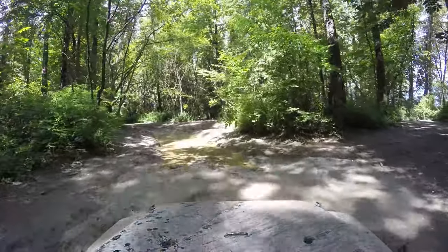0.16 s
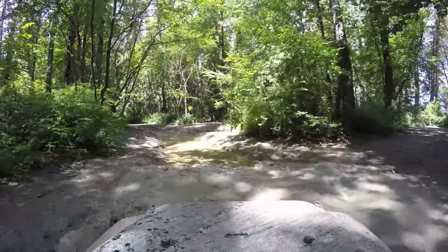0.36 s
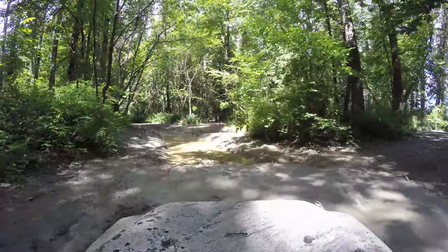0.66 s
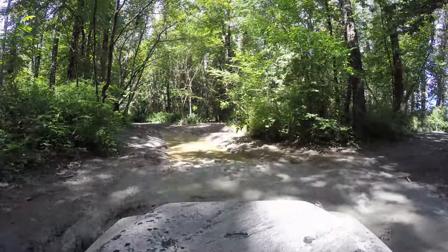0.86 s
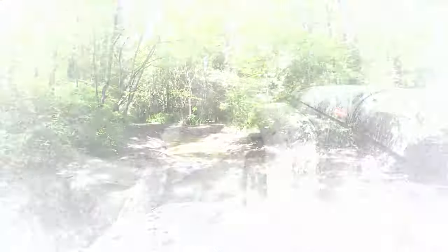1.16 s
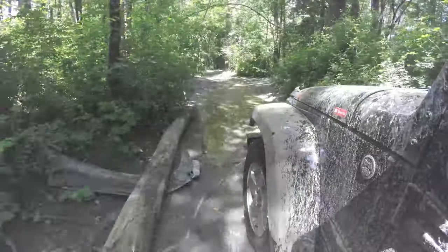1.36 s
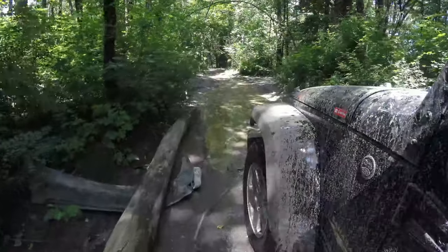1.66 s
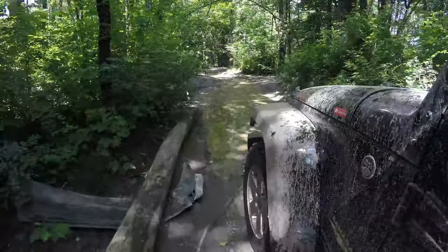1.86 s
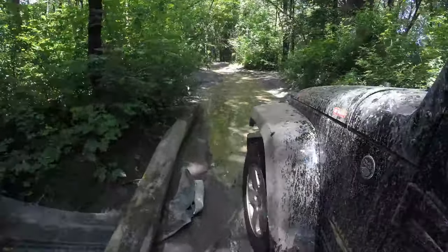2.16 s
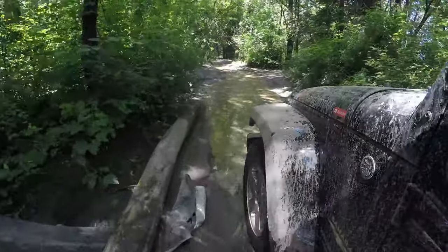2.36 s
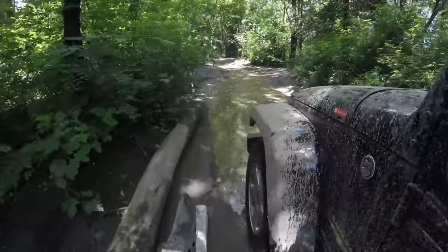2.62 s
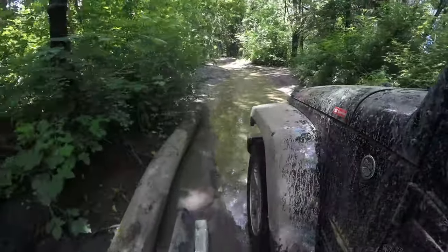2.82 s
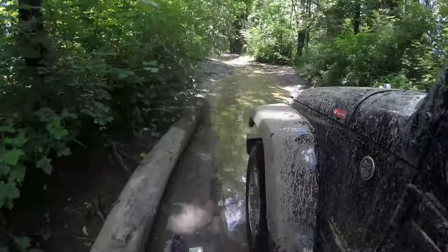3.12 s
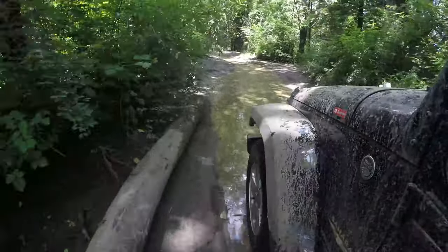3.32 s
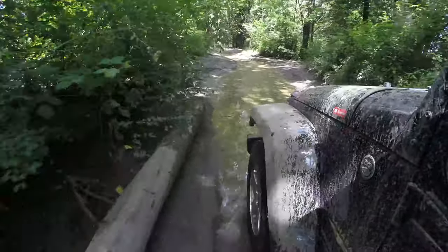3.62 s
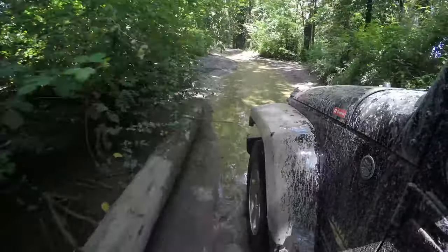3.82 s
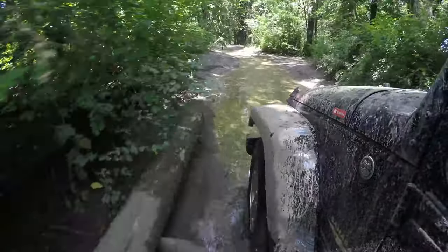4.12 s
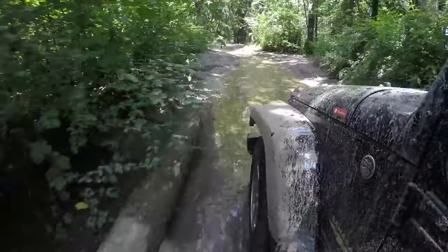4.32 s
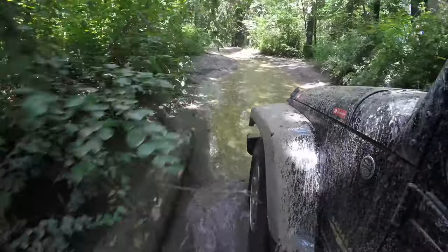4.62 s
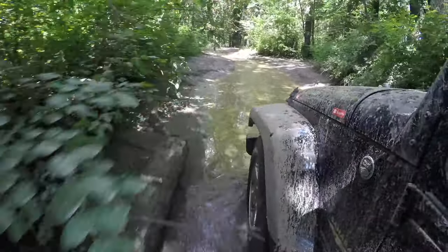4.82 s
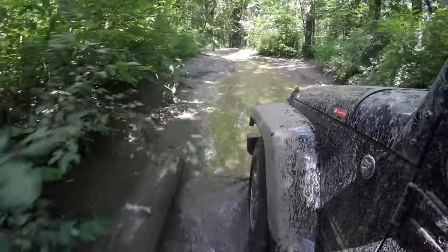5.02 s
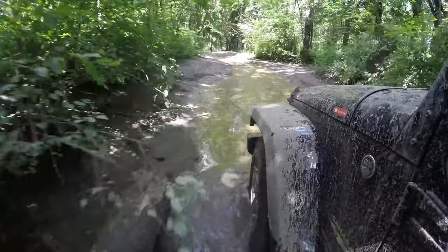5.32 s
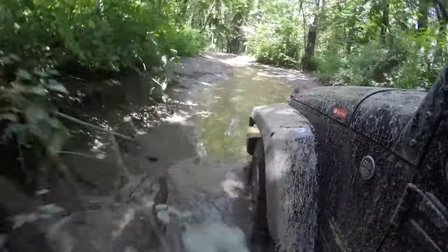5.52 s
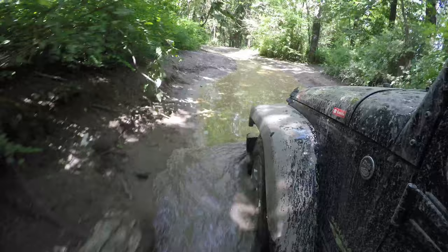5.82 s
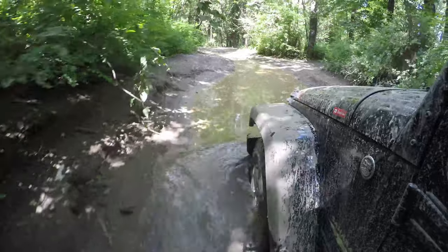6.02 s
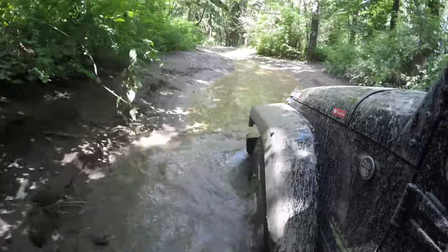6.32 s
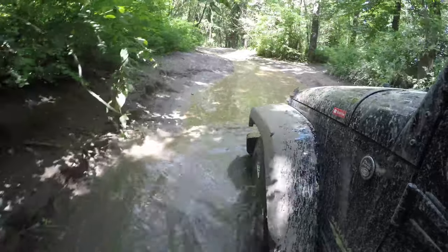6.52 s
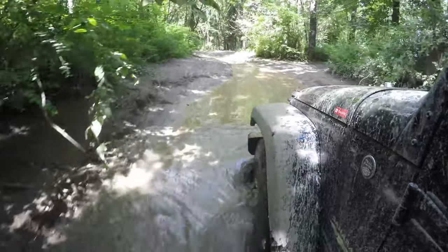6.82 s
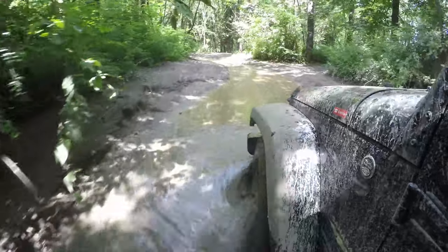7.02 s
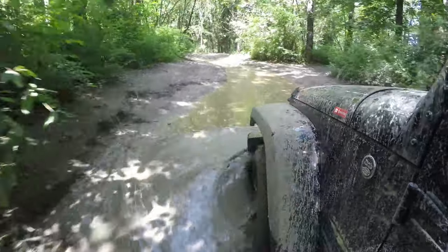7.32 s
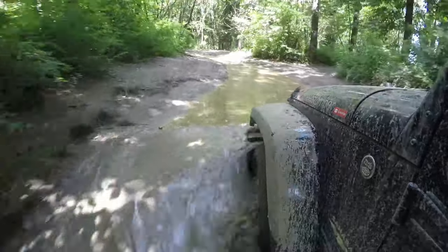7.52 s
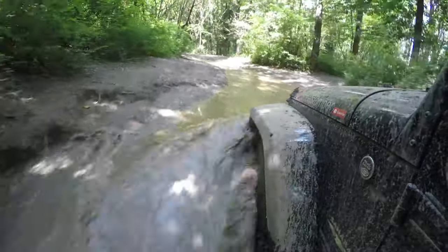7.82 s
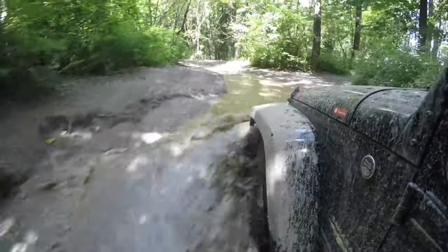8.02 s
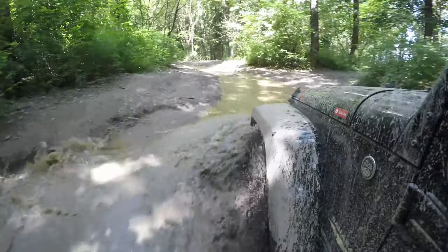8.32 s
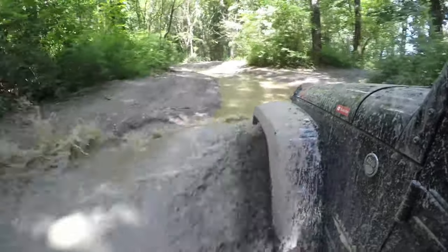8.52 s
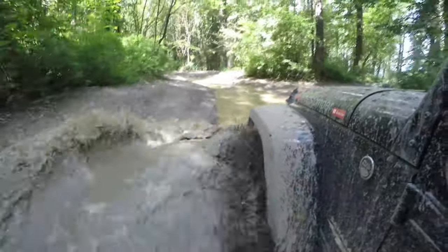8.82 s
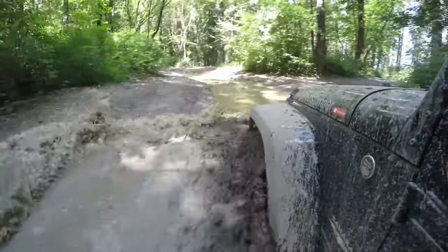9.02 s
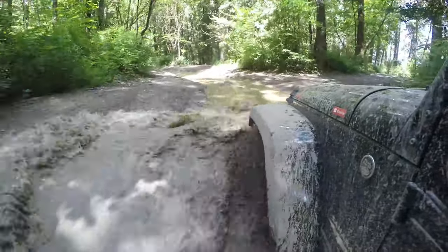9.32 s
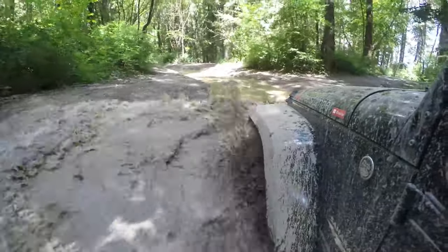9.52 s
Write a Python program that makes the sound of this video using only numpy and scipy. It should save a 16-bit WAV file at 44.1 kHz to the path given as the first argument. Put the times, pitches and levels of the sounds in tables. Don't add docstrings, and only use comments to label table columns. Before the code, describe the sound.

Mounted on an off-road vehicle's hood, the microphone catches a booming six-cylinder engine, valve clatter and a loose metallic rattle. Within about a second and a half it crossfades to the door side, much quieter: low hum, thin water spray, tiny drops and twigs ticking on the case. The water deepens, the engine revs and labours, and muddy splashes and knocks close it. A very low throbbing wobble runs throughout.

```python
import sys
import numpy as np
from scipy import signal
from scipy.fft import rfft, irfft, next_fast_len
from scipy.io import wavfile
from scipy.ndimage import uniform_filter1d

SR = 44100
rng = np.random.default_rng(int(sys.argv[2]) if len(sys.argv) > 2 else 0)


def bounce(signal):
    frames = np.transpose(np.atleast_2d(signal))
    limited = np.clip(frames, -1, 1)
    pcm = np.round(limited * 32767).astype(np.int16)
    wavfile.write(sys.argv[1], SR, pcm)


def attenuation_scalar(level_db):
    decades = np.asarray(level_db, float) / 20
    return 10 ** decades


N = 426006


def seconds():
    return np.arange(N) / SR


def evened(x):
    return x / np.sqrt(np.mean(x ** 2) + 1e-20)


def track(rows):
    s, *columns = np.transpose(rows)
    t = seconds()
    lead_s = 0.03 * (s[0] <= 0)
    on = np.clip(np.minimum(t - s[0] + lead_s, s[-1] + 0.01 - t) / 0.03, 0, 1)
    return [np.interp(t, s, c) for c in columns] + [on]


def body(slope, modes=(), notch=(1, 1, 0)):
    hz = np.fft.rfftfreq(32768, 1 / SR)
    f, db = np.transpose(slope)
    power = attenuation_scalar(np.interp(np.log(hz + 1), np.log(f), db)) ** 2
    for centre_hz, width, peak_db in modes:
        power = power + attenuation_scalar(peak_db) ** 2 / (1 + (2 * (hz - centre_hz) / width) ** 2) ** 2
    power = power / (1 + (hz / f[-1]) ** 6)
    notch_hz, notch_width, depth = notch
    power = power * (1 - min(depth, 1) / (1 + (2 * (hz - notch_hz) / notch_width) ** 2))
    log_gain = 0.5 * np.log(np.concatenate([power, power[-2:0:-1]]) + 1e-14)
    taps = np.fft.ifft(np.exp(np.conj(signal.hilbert(log_gain)))).real[:len(hz)]
    taps = taps * np.cos(np.linspace(0, np.pi / 2, len(hz))) ** 2
    return taps / np.linalg.norm(taps)


def ring(drive, taps):
    return signal.oaconvolve(drive, taps)[:N]


def drift(span_s):
    size = max(round(span_s * SR), 2)
    return evened(uniform_filter1d(uniform_filter1d(rng.standard_normal(N), size), size))


def patchy(patchy_db, flicker_db, size, count=N):
    frames = count // (size // 4) + 5
    a, b, patches = rng.standard_normal((frames, size // 2 + 1, 3)).T
    patches = uniform_filter1d(patches, max(round(700 * size / SR), 1), 0)
    patches = evened(uniform_filter1d(patches, max(round(0.03 * 4 * SR / size), 2), 1))
    flicker = evened(uniform_filter1d(rng.standard_normal(frames), 6))
    z = (a + 1j * b) * attenuation_scalar(patchy_db * patches + flicker_db * flicker)
    noise = signal.istft(z, nperseg=size, noverlap=size - size // 4)[1][:count]
    return np.pad(evened(noise), (0, N - count))


def tone(hz, size, waver):
    turns = np.cumsum(hz * (1 + waver * drift(0.04))) / SR
    return np.sqrt(2) * size * np.cos(2 * np.pi * turns)


def bursts(times, peaks_db, length_s):
    out, t = np.zeros(N + 2048), np.arange(2048) / SR
    shape = (1 - np.exp(-t / 0.001)) * np.exp(-t / length_s)
    for s, db, noise in zip(times, peaks_db, rng.standard_normal((len(times), 2048))):
        out[round(s * SR):][:2048] += attenuation_scalar(db) * noise * shape
    return out[:N]


def blows(rows):
    s, db = np.transpose(rows)
    out = np.zeros(N)
    out[np.round(s * SR).astype(int)] = attenuation_scalar(db)
    return out


def thirds(x):
    size = next_fast_len(len(x))
    z, hz = rfft(x, size), np.fft.rfftfreq(size, 1 / SR)
    low = 1 / (1 + (hz / 3150) ** 8)
    top = 1 - 1 / (1 + (hz / 5400) ** 8)
    return [irfft(z * share, size)[:len(x)] for share in (low, 1 - low - top, top)]


def arch(start, length, crest, flat=1.):
    u = np.clip((seconds() - start) / length, 0, 1)
    bend = np.log(0.5) / np.log(np.clip(crest, 0.1, 0.9))
    return abs(np.sin(np.pi * u ** bend)) ** flat * (u < 1)


def peak(hz, centre_hz, width):
    return 1 / np.sqrt(1 + (2 * (hz - centre_hz) / width) ** 2)


# start in seconds, rms level in dB,
# crest as share of length, swing left over at the start in dB.
HOOD_SWELLS = [
    (0.0, -19.5, 0.089, -35),
    (0.13, -23, 0.68, -36),
    (0.26, -28, 0.36, -35),
    (0.34, -17.5, 0.55, -27),
    (0.52, -17.5, 0.34, -15.5),
    (0.9, -22.5, 0.8, -34.5),
    (1.08, -28, 0.35, -27),
]
DOOR_SWELLS = [(1.159, -18.5, 0.45, -30), (1.971, -29.5, 0.31, -25), (2.171, -31.5, 0.53, -46),
               (2.439, -24.5, 0.48, -26.5), (2.6, -19, 0.5, -48), (3.162, -19.5, 0.46, -24.5),
               (3.4, -23.5, 0.28, -37), (3.88, -26, 0.67, -50), (4.169, -22, 0.43, -34),
               (4.5, -23, 0.58, -28), (4.738, -30, 0.38, -45), (4.852, -28.5, 0.32, -33),
               (5.25, -27, .5, -23.5), (5.4, -21.5, 0.34, -60), (5.719, -24.5, 0.51, -36),
               (5.95, -23.5, 0.51, -25), (6.1, -21, 0.55, -31), (6.349, -20.5, 0.53, -23),
               (6.555, -19, 0.45, -19.5), (6.801, -23, 0.44, -37), (7.232, -18.5, 0.5, -36),
               (7.449, -19.5, 0.71, -21.5), (7.85, -17.5, 0.6, -39), (8.121, -19, 0.47, -16),
               (8.35, -16, 0.67, -15.5), (8.802, -15.5, 0.38, -19), (9.1, -18.5, 0.51, -24),
               (9.29, -20.5, 0.69, -42), (9.422, -17, 0.31, -36)]
# time in seconds, pitch in Hz.
ARM_NOTE = [(0.0, 35.6), (0.21, 37.3), (1.91, 39.16), (3.12, 39.9), (3.28, 37), (3.79, 37.16), (3.9, 33.2),
            (4.14, 39.7), (4.71, 38.85), (4.87, 36.32), (6.19, 35.16), (6.38, 38.98), (8.47, 37.64),
            (8.98, 35.03), (9.66, 39.05)]
# centre in Hz, width in Hz, level in dB.
ARM_SHAKE = [(38., 8., -50.), (25., 10., -44.)]


def camera_arm():
    s, db, crest, left_db = np.transpose([*HOOD_SWELLS, *DOOR_SWELLS])
    t = seconds()
    k = np.maximum(np.searchsorted(s, t, "right") - 1, 0)
    length = np.diff(np.r_[s, 9.72])
    kick = (-1.) ** k * attenuation_scalar(db[k] + 5) * arch(s[k], length[k], crest[k], flat=0.7)
    kick = uniform_filter1d(uniform_filter1d(kick, 120), 120) * attenuation_scalar(0.6 * drift(0.036))
    left_over = 1j * attenuation_scalar(np.interp(t, s, left_db))
    turns = np.cumsum(track(ARM_NOTE)[0]) / SR
    swing = np.sqrt(2) * ((kick + left_over) * np.exp(2j * np.pi * turns)).real
    shake = sum(attenuation_scalar(db) * body([(10, -63), (80, -82.5)], [(hz, width, 0)]) for hz, width, db in ARM_SHAKE)
    return swing + ring(rng.standard_normal(N), shake)


def valve_train(turns):
    count = 2 * SR
    waver = drift(0.094)[(np.arange(40)[:, None] * 9000 + np.arange(count)) % N]
    comb = 0
    for k in range(11, 21):
        phase = k * turns[:count] + 0.07 * waver[k + 12] + rng.random()
        comb = comb + attenuation_scalar(4.6 * waver[k]) / k * np.cos(2 * np.pi * phase)
    return np.pad(evened(comb), (0, N - count))


# time in seconds, crank turns a second.
HOOD_REV = [
    (0.0, 39.4),
    (0.346, 38.8),
    (0.546, 37.8),
    (0.698, 39.5),
    (0.82, 41.7),
    (1.04, 45.0),
    (1.226, 47.0),
    (1.32, 47.0),
    (1.55, 43.8),
]
# time in seconds, level in dB.
HOOD_LOAD = [
    (0.0, 2),
    (0.04, -14.5),
    (0.14, -2.5),
    (0.36, 2.5),
    (0.44, -6),
    (0.53, 0.5),
    (0.7, -6.5),
    (1.0, -2),
    (1.08, 2.5),
]
# multiple of crank speed, level in dB.
FIRING_OVERTONES = [(6, 1), (12, -17.5)]
# multiple of crank speed, level in dB.
CRANK_ORDERS = [(2, -42), (3.5, -33), (4.5, -40), (5, -40), (7, -45), (8, -48)]
# frequency in Hz, level in dB.
HOOD_RUMBLE = [(40, -2.5), (60, 8.5), (100, 1), (145, 16.5), (200, -7), (400, -10), (550, -18),
               (800, -51.5)]
# frequency in Hz, level in dB.
HOOD_CLATTER = [(300, -16.5), (600, -11.5), (1300, 0.5), (1650, -14), (2600, -18), (6000, -27), (9000, -38),
                (16000, -47)]
# centre in Hz, width in Hz, level in dB.
HOOD_CASE = [(955, 69, 3.5), (1196, 55, 7), (2045, 640, -5), (3400, 550, -31.5), (5000, 600, -25)]


def hood_engine():
    rev, load_db = track(HOOD_REV)[0], track(HOOD_LOAD)[0]
    on = np.interp(seconds(), (1.023, 1.493), (1, 0)) ** 1.32
    turns = np.cumsum(rev) / SR
    roar_db = 0.14 * load_db
    rumble_db, clatter_db = -33 + roar_db, -38 + roar_db

    boom_hz, boom_width = 143.2, 14
    fire = attenuation_scalar(load_db - 13) * peak(rev * 3, boom_hz, boom_width)
    fourth = attenuation_scalar(load_db - 13) * peak(rev * 4, boom_hz, boom_width)
    lines = fire * attenuation_scalar(1.5 * drift(0.05)) * np.cos(6 * np.pi * turns)
    lines = lines + fourth * attenuation_scalar(2.5 * drift(0.05)) * np.cos(8 * np.pi * turns)
    overtones = sum(attenuation_scalar(db - 18.5) * np.cos(2 * np.pi * np.round(k) * turns) for k, db in FIRING_OVERTONES)
    lines = lines + fire * on * attenuation_scalar(4.3 * drift(0.053)) * overtones
    lines = lines + fire * attenuation_scalar(-30.5 + 5 * drift(0.06)) * np.cos(18 * np.pi * turns)
    lines = lines * attenuation_scalar(0.57 * drift(0.0039))
    for k, db in CRANK_ORDERS:
        size = attenuation_scalar(db + clatter_db + 37.5 + 4 * drift(0.15))
        lines = lines + size * np.cos(2 * np.pi * (k * turns + rng.random()))

    roar = patchy(1.4, 0.4, size=1024, count=2 * SR)
    rumble = attenuation_scalar(rumble_db + 11) * ring(roar, body(HOOD_RUMBLE))
    ticking = patchy(1.4, 0.56, size=256, count=2 * SR) + 0.32 * valve_train(turns)
    clatter = attenuation_scalar(clatter_db + 2.5) * ring(ticking, body(HOOD_CLATTER, HOOD_CASE))
    return np.sqrt(2) * on * lines + on ** 1.05 * (rumble + clatter)


# time in seconds, peak level in dB.
RATTLES = [(0.249, -38), (0.265, -11), (0.3581, -32), (0.382, -9), (0.395, -11), (0.4379, -7.5),
           (0.4444, -10), (0.523, -9.5), (0.5529, -8.5), (0.5774, -10.5), (0.975, -13)]
CLIP_MODES = [(2046, 7.5, 0.019), (2214, 6.5, 0.016), (2940, -17.5, 0.025), (3420, -7.5, 0.0091),
              (4900, -24, 0.017), (6700, -33, 0.019), (7400, -46, 0.015), (8000, -35, .02),
              (10600, -39.5, 0.016)]


def rattling_clip():
    s, db = np.transpose(RATTLES)
    t = np.arange(2048) / SR
    modes = 0
    for hz, mode_db, t60 in CLIP_MODES:
        shape = attenuation_scalar(mode_db - 60 * t / t60) * (1 - np.exp(-t * hz / 10.5)) ** 2
        modes = modes + shape * np.sin(2 * np.pi * hz * t)
    _, mid, top = thirds(bursts(s - 0.002, db - 23, 0.0086))
    return ring(blows(np.transpose([s - 0.002, db + 3])), modes) + mid + attenuation_scalar(-20) * top


def fade_in():
    return np.interp(seconds(), (0.93, 1.6), (0, 1))


# time in seconds, level in dB.
EFFORT = [
    (1.0, -40),
    (1.6, -54.5),
    (5.3, -55.5),
    (6.4, -51),
    (7.3, -49),
    (7.7, -40.5),
    (8.5, -34),
    (9.25, -37.5),
    (9.66, -31.5),
]
# frequency in Hz, level in dB.
DOOR_HUM = [(45, 8.5), (70, -0.5), (130, -6.5), (210, -20), (270, -31)]
# frequency in Hz, level in dB.
DOOR_SHAKE = [(100, -8.5), (260, -16), (450, -12.5), (750, -24), (1000, -34.5)]
# centre in Hz, width in Hz, level in dB.
DOOR_PANEL = [(98, 9.3, 5.5), (183.5, 13.5, 7), (226, 28, -4), (301, 39, -4), (346.5, 29, 0),
              (399, 31, -11.5), (516, 84, -12), (634, 31, -8.5), (1085, 180, -9)]
# time in seconds, peak level in dB.
KNOCKS = [(3.701, -69), (5.333, -29), (5.35, -41), (5.564, -35), (5.58, -35), (5.664, -36), (6.249, -51),
          (8.845, -19), (8.871, -26), (8.925, -20), (9.095, -31), (9.105, -9), (9.13, -28), (9.15, -10),
          (9.167, -19), (9.185, -31), (9.42, -18.5), (9.593, -20)]
# centre in Hz, width in Hz, level in dB.
KNOCK_MODES = [(308, 31, -0.5), (349.5, 28, 4), (414, 38, -11), (500, 34, -17), (1130, 120, -21)]


def chassis(thud):
    effort_db = track(EFFORT)[0]
    hum_db = -51 + 0.56 * (effort_db + 59) + 5.5
    hum = attenuation_scalar(hum_db) * ring(patchy(0.88, 0.26, size=2048), body(DOOR_HUM, DOOR_PANEL[:3]))
    push = attenuation_scalar(effort_db) + thud
    shake = push * ring(patchy(0.49, 1.4, size=1024), body(DOOR_SHAKE, DOOR_PANEL[3:]))
    knock = body([(60, -19), (200, -8), (450, -27), (700, -62), (1500, -73)], KNOCK_MODES)
    soft_blows = ring(blows(KNOCKS), np.hanning(30) / 15)
    return fade_in() * (hum + shake) + attenuation_scalar(19) * ring(soft_blows, knock)


def droplets():
    cycles, drops_per_s = 4, 400
    size = attenuation_scalar(4 * np.minimum(rng.exponential(1, N), 3)) * (rng.random(N) < drops_per_s / SR)
    kind, out = rng.integers(0, 16, N), np.zeros(N)
    for k, hz in enumerate(np.geomspace(2200, 10000, 16)):
        turns = np.arange(0, 3 * cycles, hz / SR)
        blip = hz * turns * np.exp(-3 * turns / cycles) * np.sin(2 * np.pi * turns)
        out += ring(size * (kind == k), blip)
    return evened(out)


# time in seconds, level in dB.
WATER = [(1.0, -50.5), (2.1, -55), (3.28, -56.5), (3.31, -52), (3.5, -53.5), (5.2, -52), (5.6, -50.5),
         (5.75, -46), (6.32, -46.5), (7.2, -45), (7.78, -39), (8.4, -35.5), (8.84, -36), (9.04, -40),
         (9.22, -35.5), (9.52, -34.5), (9.66, -32.5)]
# start in seconds, length in seconds, dull level in dB,
# bright level in dB.
SLAPS = [
    (9.06, .035, -31, -45),
    (9.088, .04, -30, -45),
    (9.122, .022, -34, -48),
    (9.142, .028, -31, -45),
    (8.5, .14, -42, -60),
    (3.295, .2, -70, -55),
    (5.675, .14, -60, -48),
    (6.74, .3, -70, -52),
    (2.38, .05, -70, -57),
]
# time in seconds, peak level in dB, brightness in dB.
TICKS = [(2.026, -38, -8), (2.064, -28, -15), (2.2199, -41, -29), (2.3434, -41, -15), (2.3943, -40, -22),
         (2.448, -35.5, -19), (2.89, -45, 0), (2.9343, -32.5, -20), (3.301, -32, -10), (3.6531, -36, -9),
         (3.709, -41, -32), (3.771, -39, -30), (3.823, -41, -26), (4.198, -42, -28), (4.453, -41, -1),
         (4.526, -35.5, -2), (4.9298, -40, -14), (5.099, -41, 11), (5.198, -41, 2), (5.5962, -34, -14),
         (5.680, -35, -24), (5.6958, -31, -29), (7.8283, -23, -26), (9.411, -20, -8)]
# frequency in Hz, level in dB.
DOOR_SPRAY = [(500, -18), (800, -15.5), (1600, -13.5), (3100, -10.5), (5200, -17.5), (8800, -32),
              (11000, -32.5), (17000, -38)]
# centre in Hz, width in Hz, level in dB.
DOOR_CASE = [(1106, 450, -11), (1919, 255, -1), (2454, 400, -2.5), (3918, 1240, -5), (4610, 270, -7),
             (5770, 1060, -15.5), (6640, 200, -16.5), (7580, 1500, -23.5), (9940, 740, -29),
             (11500, 640, -33)]


def wading(splash):
    spray_db = track(WATER)[0]
    mid_db = -1.3 + 0.18 * (spray_db + 38)
    top_db = -5 + 0.15 * (spray_db + 38)
    low, mid, top = thirds(patchy(1.1, 0.66, size=256) + 0.24 * droplets())
    air = signal.sosfiltfilt(signal.butter(2, 10800, "high", fs=SR, output="sos"), top)
    top = top + (attenuation_scalar(0.054 * (spray_db + 24)) - 1) * air
    water = attenuation_scalar(spray_db + 2.5) * (low + attenuation_scalar(mid_db - 2) * mid + attenuation_scalar(top_db + 9.5) * top)
    water = water + splash * (low + attenuation_scalar(-8.5) * mid + attenuation_scalar(-1.5) * top)
    for s, length, dull_db, wet_db in SLAPS:
        water = water + arch(s, length, 0.23) * (attenuation_scalar(dull_db) * low + attenuation_scalar(wet_db) * mid)

    s, db, bright_db = np.transpose(TICKS)
    low_db = db - 10 - 0.4 * bright_db - 0.5
    mid_db = db - 10.5 - 0.25 * bright_db + 0.22
    top_db = db - 13 + 0.55 * bright_db + 20.5
    ticks = sum(thirds(bursts(s - 0.001, band_db, 0.007))[k] for k, band_db in enumerate((low_db, mid_db, top_db)))
    ticks = signal.sosfilt(signal.butter(2, 9000, "low", fs=SR, output="sos"), ticks)
    notch = (3140, 177, 1)
    return fade_in() * ring(water + ticks, body(DOOR_SPRAY, DOOR_CASE, notch))


# time in seconds, peak level in dB.
FADE_STEPS = [(1.061, -52), (1.1273, -56.5), (1.1942, -55), (1.2276, -52), (1.2605, -71), (1.294, -46.5),
              (1.3274, -59), (1.3608, -54.5), (1.3942, -68), (1.4606, -69.5)]


def fade_clicks():
    high = signal.butter(2, 5000, "high", fs=SR, output="sos")
    return signal.sosfilt(high, attenuation_scalar(21) * blows(FADE_STEPS))


# time in seconds, firings a second.
MUD_REV = [
    (7.95, 135),
    (8.14, 170),
    (8.24, 194),
    (8.34, 214),
    (8.46, 231),
    (8.6, 243),
    (8.8, 258),
]
# multiple of the firing, level in dB.
MUD_OVERTONES = [(2, -15), (3, -13.5)]
# time in seconds, pitch as share.
LUGGING = [
    (1.5, 1.04),
    (1.65, .97),
    (1.9, 1.0),
    (8.8, .97),
    (9.16, 1.015),
    (9.29, .965),
    (9.5, .975),
    (9.66, 1.025),
]
# start in seconds,
# length in seconds, pitch in Hz, # level in dB, crest as share of length.
DRONES = [
    (1.6, 0.56, 83, -40, 0.33),
    (8.38, .36, 189, -37, .3),
    (8.81, 0.09, 178, -33, 0.5),
    (3.69, .06, 585, -52, .25),
    (8.895, 0.55, 186, -23.5, 0.63),
    (9.42, 0.33, 190, -32.5, 0.36),
    (8.78, 0.4, 233, -35.5, 0.52),
    (9.318, 0.21, 230, -27, 0.46),
    (9.502, 0.43, 221, -28, 0.34),
    (9.04, 0.59, 98, -32.5, 0.698),
]


def door_engine():
    hz, on = track(MUD_REV)
    ease_db = np.interp(seconds(), (7.4, 9.7), (0, -15))
    on = on * attenuation_scalar(ease_db + 1.9 * drift(0.02))
    panel = attenuation_scalar(-18) + sum(peak(hz, f, 0.92 * width) ** 2 for f, width, _ in DOOR_PANEL[1:3])
    rev_db = -31
    out = tone(hz, on * attenuation_scalar(rev_db) * panel, 0.012)
    out = out + tone(hz / 2, on * attenuation_scalar(-48), 0.0077)
    for k, db in MUD_OVERTONES:
        out = out + tone(hz * np.round(k), on * attenuation_scalar(rev_db + db) * peak(hz, 210, 30), 0.0099)
    lug, uneven = track(LUGGING)[0], attenuation_scalar(1.8 * drift(0.022))
    for start, length, drone_hz, db, crest in DRONES:
        size = attenuation_scalar(db) * uneven * arch(start, length, crest, flat=0.64)
        out = out + tone(drone_hz * lug, size, 0.0087)
    return out


# start in seconds, length in seconds, spray level in dB, thud level in dB.
SPLASHES = [(2.03, 0.083, -61.5, -70), (2.35, 0.42, -63, -88), (2.671, 0.19, -53, -82),
            (3.29, 0.31, -74, -87), (3.819, 0.049, -55, -83), (3.686, 0.39, -60, -90),
            (5.3, 0.084, -69, -64), (5.547, 0.097, -87, -58), (5.677, 0.036, -43, -56),
            (7.38, 0.066, -53, -58), (8.823, 0.22, -65, -38.5), (9.039, 0.22, -49.5, -32.5),
            (9.355, 0.15, -40.5, -44), (9.568, 0.0468, -55, -48)]


def splashes():
    spray, thud = np.zeros(N), np.zeros(N)
    for s, length, spray_db, thud_db in SPLASHES:
        shape = arch(s, length, 0.38)
        spray += attenuation_scalar(spray_db) * shape
        thud += attenuation_scalar(thud_db) * shape
    return spray, thud


# time in seconds, peak level in dB, pitch in Hz.
PIPS = [(3.2999, -34, 4520), (3.3348, -38.5, 3610), (3.3897, -42, 4290), (3.4306, -41, 4120),
        (3.4396, -41, 4620), (3.5882, -44, 3880), (3.6187, -41, 3820), (3.6521, -41.5, 3730),
        (3.7334, -42, 4660), (3.7735, -41, 4600), (3.8275, -42, 3740), (3.8674, -38.5, 3810),
        (3.926, -39, 4340), (4.2213, -46, 3770), (4.3186, -50, 4150), (4.3605, -42, 4490),
        (4.4134, -41.5, 4710), (4.6883, -42, 3760), (4.775, -42.5, 4000), (4.9283, -41, 3700),
        (5.0424, -44, 4430), (5.182, -45, 3950)]
DEEP_PIPS = [(5.8366, -38.5, 3320), (6.0444, -37, 4120), (6.2824, -37.5, 4100), (6.4732, -34, 3970),
             (6.5435, -38, 4590), (6.6762, -39, 4640), (6.7674, -37, 4090), (6.79, -35, 4460),
             (6.8644, -41, 4400), (6.9472, -32, 4245), (6.9714, -36, 4250), (7.078, -31.5, 4120),
             (7.1463, -40, 4550), (7.9867, -31, 3930), (8.3679, -25, 3500), (8.4078, -28, 4210),
             (8.777, -31.5, 4560)]
FINE_PIPS = [
    (2.0637, -34, 2700),
    (2.0665, -29.5, 3930),
    (3.271, -44, 5400),
    (3.947, -50, 8500),
    (3.968, -44, 7450),
    (6.445, -42.5, 8000),
    (6.476, -40, 7400),
    (6.865, -38, 8100),
    (6.885, -41, 8000),
    (7.071, -34.5, 6300),
]


def pips():
    out, t = np.zeros(N + 512), np.arange(512) / SR
    rows = [*PIPS, *DEEP_PIPS, *FINE_PIPS]
    for (s, db, hz), noise in zip(rows, rng.standard_normal((len(rows), 512))):
        u = t * np.sqrt(hz * 4500) / 3.5
        note = np.e * u * np.exp(-u) * np.sin(2 * np.pi * hz * t)
        edge = attenuation_scalar(-12) * (noise - np.roll(noise, 3)) / 2 * np.exp(-t / 0.0015)
        out[round((s - 0.001) * SR):][:512] += attenuation_scalar(db - 4) * (note + edge)
    return out[:N]


def scene():
    spray, thud = splashes()
    hood = hood_engine() + rattling_clip()
    door = chassis(thud) + wading(spray) + door_engine() + pips()
    return (camera_arm() + hood + door)[None]


def roll_off(x):
    return signal.sosfilt(signal.butter(12, 15150, fs=SR, output="sos"), x)


def record(dry):
    return roll_off(dry + fade_clicks())


dry = scene()
out = record(dry)
bounce(out)
```